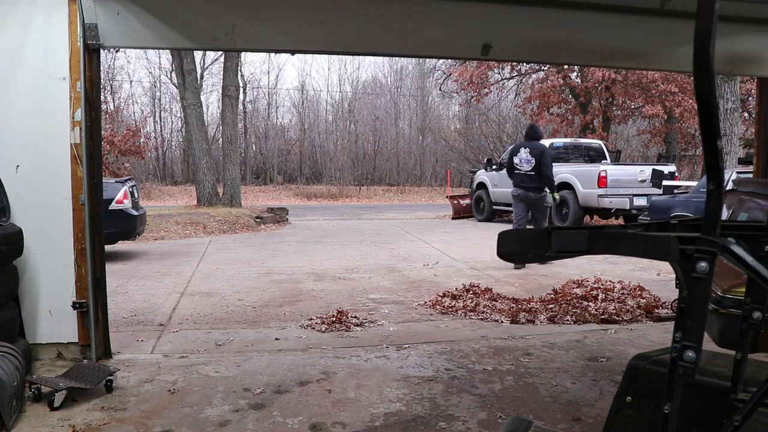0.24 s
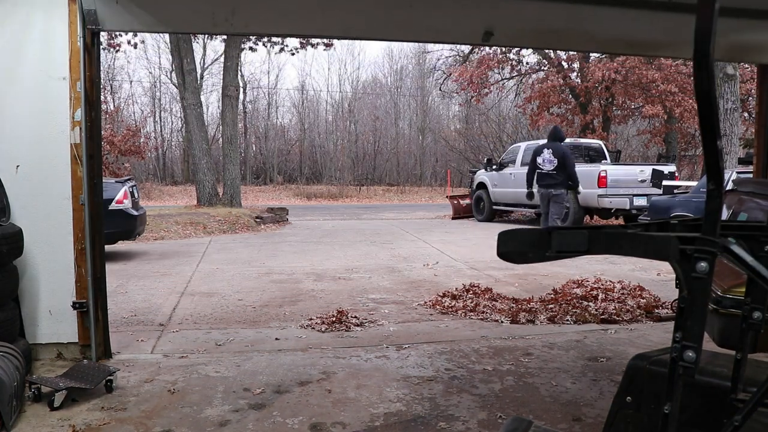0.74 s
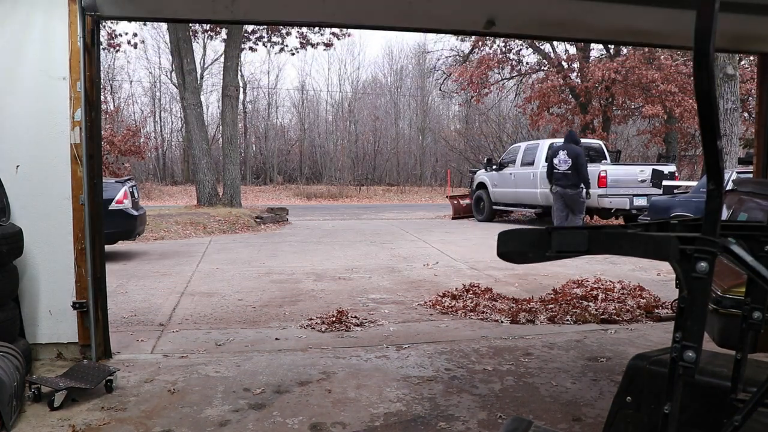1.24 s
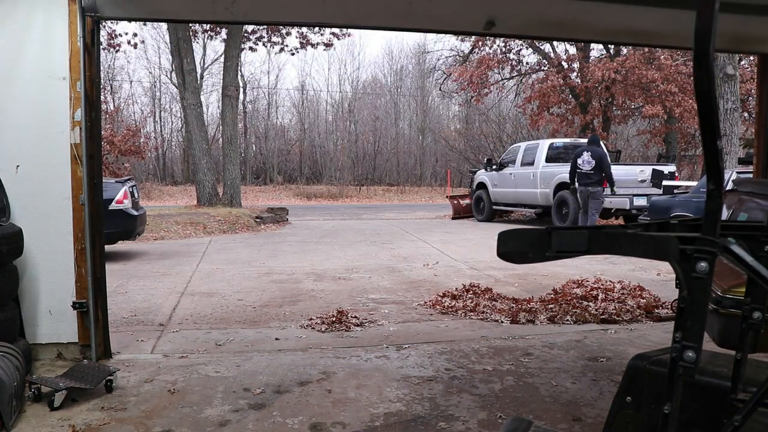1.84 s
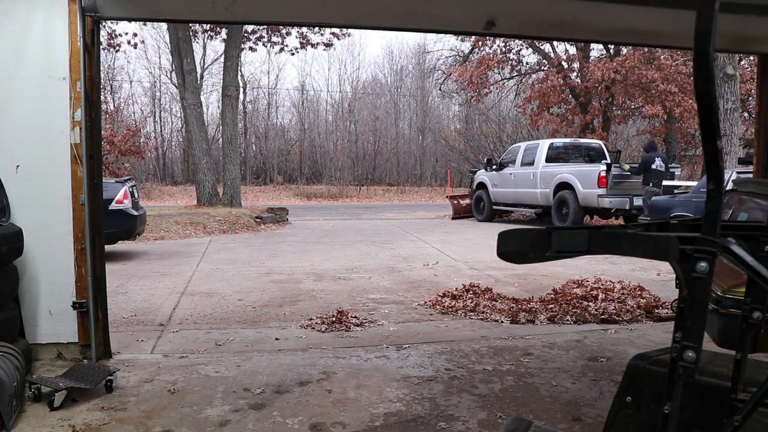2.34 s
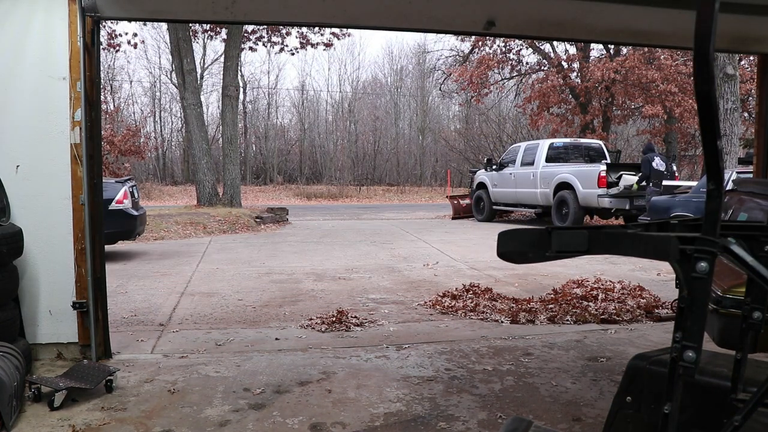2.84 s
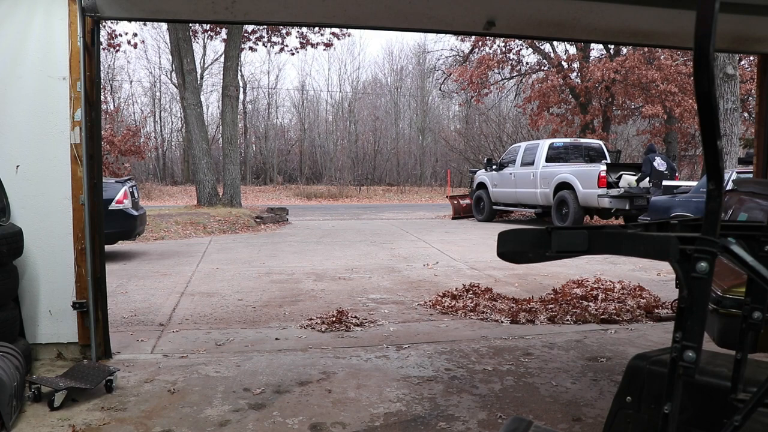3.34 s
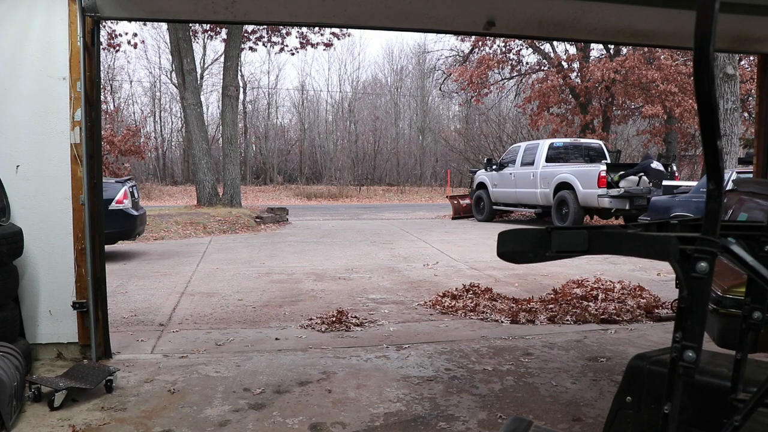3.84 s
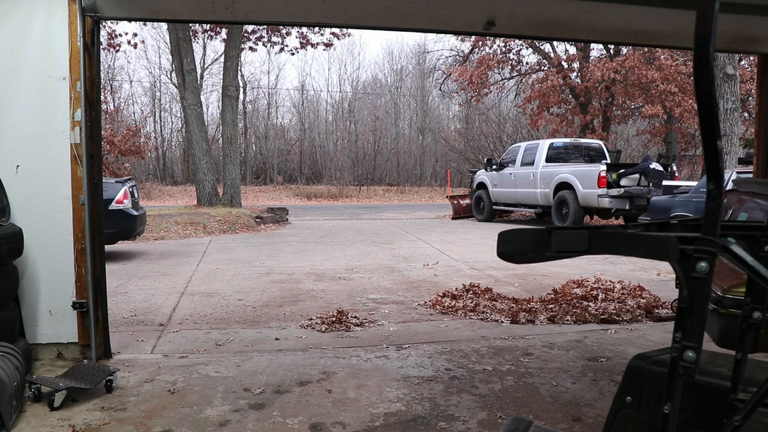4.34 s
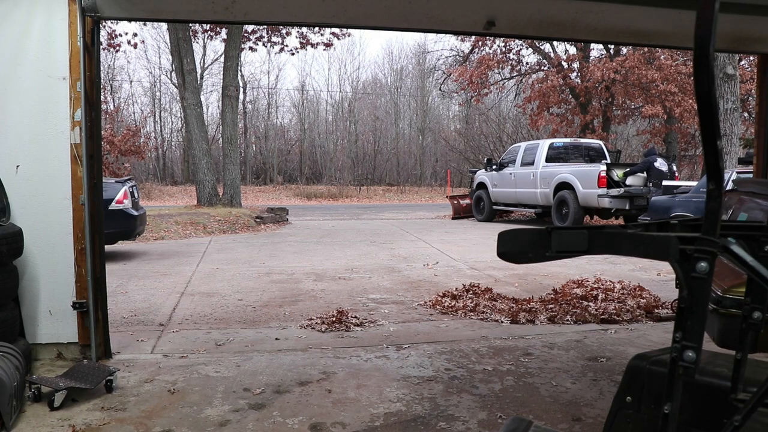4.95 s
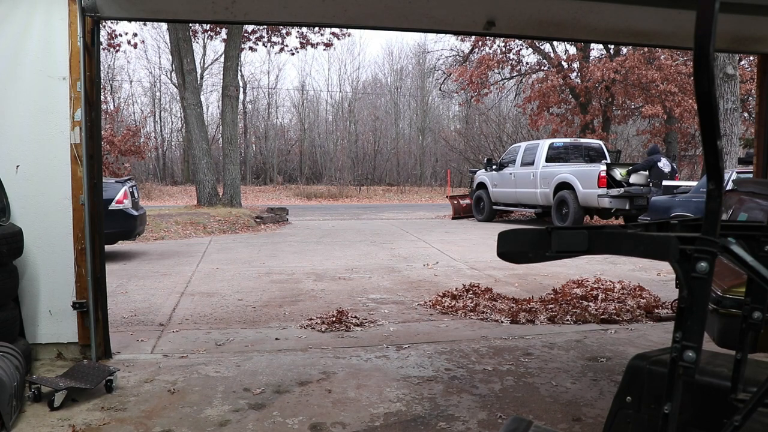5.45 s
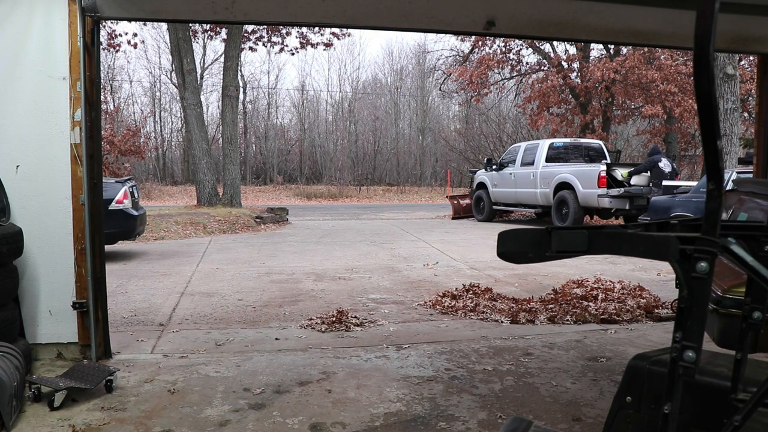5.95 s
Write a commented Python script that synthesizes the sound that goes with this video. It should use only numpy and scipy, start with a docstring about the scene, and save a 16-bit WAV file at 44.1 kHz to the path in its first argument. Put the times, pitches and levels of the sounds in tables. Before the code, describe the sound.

A motor buzz and gritty door rumble cut out after a second, followed by sharp snaps, metallic knocks, brief squeaks and light chain jingles.

```python
"""An electric opener hums and drags a sectional door up its tracks, then stops and the door settles.
The hum is a few unsteady sine waves; the door is gritty noise through resonances, with jolts on top.
Boards and tools knock, scrape and squeak on a truck bed: noise bursts that make sheet metal ring.
Sharp snaps sound close by and a small chain jingles as a group of high sine tones.
Knocks, scrapes, squeaks and snaps echo briefly in the open garage, over a faint bed of outdoor air."""
import sys
import numpy as np
from scipy import signal
from scipy.fft import rfft, irfft, next_fast_len
from scipy.io import wavfile
from scipy.ndimage import uniform_filter1d

SR = 44100
rng = np.random.default_rng(int(sys.argv[2]) if len(sys.argv) > 2 else 0)


def store_pcm(level_fs):
    """Save levels as 16-bit WAV."""
    pcm = np.round(np.clip(level_fs, -1, 1) * 32767).astype(np.int16)
    wavfile.write(sys.argv[1], SR, np.atleast_2d(pcm).T)


N = 273861  # length of the scene [samples]

# Motor hum: fundamental, second and third harmonic: (level [dB])
HUM_LEVELS = [-17.5, -24.5, -28]
# Low shudders of the drive as it runs down: (time [s], level [dB], pitch [Hz], length [s])
SHUDDERS = [(1.15, -18.5, 219, 0.046)]
# Tone colour of the rolling door: (frequency [Hz], relative level [dB per Hz])
RUMBLE_COLOUR = [(20, -34), (100, -15.5), (300, -2.5), (460, -10), (1250, -12.5), (1700, -17.5),
                 (3640, -18.5), (4500, -25), (8000, -44.5), (15800, -51)]
# Resonances of the door and tracks: (frequency [Hz], width [Hz], level [dB])
PANELS = [(692, 35, -4), (1160, 75, -8.5), (3750, 19, -10)]
# Jolts of hinges and rollers: (time [s], clank level [dB], treble tick level [dB])
JOLTS = [(.052, -37, -40), (.14, -24, -56), (.239, -25, -63), (0.311, -24.5, -41), (.409, -23.5, -66),
         (.47, -25, -41), (.715, -25, -38.5), (0.768, -22.5, -43), (.924, -22.5, -41), (1.007, -50, -35),
         (1.07, -25, -31.5), (1.173, -26, -52)]
# Tone colour of the outdoor air: (frequency [Hz], relative level [dB per Hz])
AIR_COLOUR = [(15, -48), (25, 0.5), (179, -7.5), (654, -11), (4210, -25.5), (15800, -25.5)]
# The stopped door settles: (time [s], level [dB], bass above it [dB], brightness [dB],
# ring pitch [Hz], ring above the level [dB], contact length [s])
SETTLING = [(1.199, -27, -8, -1, 690, 9, 0.012), (1.21, -27, -1, -15, 924, -1, 0.07),
            (1.384, -51.5, -14, 14.5, 470, 12, 0.048), (1.538, -50.5, 13, 7, 820, 2, 0.034),
            (1.592, -29, -6.5, -7, 1170, -18, 0.078), (1.647, -28.5, -2.5, 2, 2086, 4, 0.032),
            (1.947, -52, 11.5, 9, 487, -4, 0.012)]
# Knocks on the truck bed: (time [s], level [dB], bass above it [dB], brightness [dB],
# ring pitch [Hz], ring above the level [dB], contact length [s])
KNOCKS = [(2.009, -34, -1, -23, 702, -4, 0.14), (2.03, -25, -1, -5, 752, 12, 0.024),
          (2.157, -40.5, -21, 4, 810, 6, 0.012), (2.243, -40.5, 0, -5, 1000, -21, 0.032),
          (2.351, -17, -1, -4, 1037, 2, 0.016), (2.559, -36, -6, -7.5, 1170, -1, 0.034),
          (2.704, -38.5, -5.5, -3.5, 1350, -13, 0.031), (3.238, -45, 1.5, -2, 1200, -8, 0.024),
          (3.348, -44, 6.5, -11.5, 677, 2, 0.022), (3.9, -54, 6, -17, 290, -8, 0.17),
          (4.081, -33.5, -1.5, -17.5, 252, -6, 0.052), (4.462, -26, -1.5, -6.5, 135, 11, 0.036),
          (4.574, -18, -8.5, -8.5, 707, -9, 0.074), (4.708, -31, -7, 0.5, 997, 6, 0.057),
          (4.806, -41.5, -9, 4.5, 967, 14.5, 0.17), (4.876, -23.5, -7, -11.5, 125, -2, 0.065),
          (5.072, -14.5, -2.5, -9, 561, 3, 0.037), (5.124, -31.5, -22, -2, 581, 12, 0.053),
          (5.281, -27.5, 3.5, -2, 221, 4, 0.033), (5.52, -32, -27, -3, 1350, 18, 0.019),
          (5.539, -31, 6.5, 0, 164, -16, 0.039), (5.573, -27, -8, -1.5, 167, 12.5, 0.017),
          (5.594, -29.5, -10, -1, 162, 9, 0.025), (5.694, -48.5, -14, 17.5, 1320, -3, 0.038),
          (5.961, -29.5, -4, -6, 547, -8, 0.018), (6.172, -45, 5.5, -14, 450, -9, 0.019)]
# Scrapes and blows with their own onset: (time [s], level [dB], bass above it [dB], brightness [dB],
# ring pitch [Hz], ring above the level [dB], contact length [s], rise [s], top band against upper band [dB])
SCRAPES = [(2.34, -30.5, -36, 3, 944, -5, 0.028, 0.0066, -1.5),
           (2.912, -46, 0, -3, 1240, -15, 0.038, 0.0014, -42),
           (3.169, -34, 1, -6, 203.4, 9.5, 0.053, 0.011, -15),
           (3.463, -23.5, -27, -11.5, 1133, 1, .015, 0.001, -19),
           (3.693, -28.5, -13, 2.5, 1463, 18, 0.025, 0.02, -0.5),
           (5.205, -23, -4, -10, 1355, 3, 0.039, 0.0017, -3.5),
           (5.478, -30, -3.5, -11, 577.3, 2, 0.077, 0.0028, -42),
           (5.763, -24.5, -4, -12, 1357, -6, 0.028, 0.0055, -35),
           (5.884, -48, 3.5, 14, 1250, 9, 0.057, 0.003, -14.5),
           (6.007, -28.5, -29, -3, 1354, 21, 0.01, 0.0066, -22)]
# Tone colour of knocks and dragging: (frequency [Hz], relative level [dB per Hz])
KNOCK_COLOUR = [(50, -27), (95, -1.5), (400, -3.5), (1300, -3.5), (1750, -9.5), (3700, -15), (4500, -19),
                (5800, -21), (6800, -27.5), (15800, -45.5)]
# Middles of the bass, middle, upper and top band of a knock: (frequency [Hz])
KNOCK_BANDS = [200, 1050, 4000, 10500]
# Resonances of the struck sheet metal: (frequency [Hz], width [Hz], level [dB])
SHEET_METAL = [(146.6, 3.4, -28), (553, 6.1, 5.5), (1200, 49, -10), (2263, 48, -1.5), (2990, 51, -8.5),
               (3760, 280, -10), (5220, 270, 1)]
# Dragging between the knocks: (time [s], level [dB])
DRAG = [(4.2, -58), (4.42, -44.5), (4.65, -35.5), (5, -29), (5.47, -47), (5.9, -46), (6.02, -37)]
# Echoes in the garage: (frequency [Hz], time to fall by 60 dB [s])
ECHO_TIMES = [(100, 0.61), (700, 0.56), (4850, 0.46), (12000, 0.28)]
# Sharp snaps close by: (time [s], level [dB], pitch [Hz])
SNAPS = [(1.591, -9, 6200), (1.6318, -8, 2900), (1.641, -7, 3800), (1.649, -6, 3300), (6.02, -14, 3330),
         (6.045, -17, 3240), (6.0615, -5.5, 3060)]
# Links of the chain: (pitch [Hz], level [dB])
LINKS = [(12925, -2), (13975, -2.5), (14255, -21), (14556, -10.5), (14643, -15)]
# Shakes of the chain: (time [s], level [dB], pitch of the favoured link [Hz], level of the links' clash [dB])
JINGLES = [(4.61, -43, 13800, -58), (4.725, -29, 14540, -49), (4.835, -57, 14720, -40),
           (4.899, -36, 14300, -66), (4.958, -38, 14660, -49), (5.132, -32, 14500, -58),
           (5.284, -30, 14800, -43), (5.429, -41, 14500, -70), (5.58, -35, 14600, -58),
           (5.695, -38, 14660, -50), (5.884, -47, 12925, -56), (6.015, -51, 13975, -53),
           (6.04, -37, 14280, -54), (6.093, -50, 13975, -42)]
# Squeaks of something rubbing: (time [s], length [s], level [dB], first pitch [Hz], last pitch [Hz])
SQUEAKS = [(4.626, 0.021, -16.5, 1424, 1314), (5.478, 0.055, -23, 676, 518),
           (5.958, 0.055, -29.5, 373, 343), (5.963, 0.046, -25, 560, 551)]

HUM_HZ = 119.9  # twice the mains frequency
START_DIP_DB, START_S = -3, 0.11  # the hum starts lower and comes up
STRAIN_S, STRAIN_LENGTH_S, STRAIN_DB = 1, 0.026, 2  # the hum swells once near the top of the travel
STOP_S, CUT_S, CUT_DB, COAST_DB_PER_S = 1.093, 0.02, -7, -84  # power off: quick drop, then a run-down
ROLL_DB, ROLLERS_DB = -21, -36  # rumble of the door and treble of its rollers
ROLL_FADE_DB_PER_S, ROLLERS_FADE_DB_PER_S = -72, -40  # their fades after the stop
REST_DB, REST_FADE_DB_PER_S = -20, -8  # a weaker part of the rumble lingers: level below it, slow fade
AIR_DB = -52.5
SETTLE_RISE_S, KNOCK_RISE_S = 0.00099, 0.0018
SETTLE_TOP_DB, KNOCK_TOP_DB = -5, -14.5  # top band against the upper band, before the next adjustment
TOP_PER_DB, USUAL_DB = -0.06, -38  # contacts with more treble than usual get slightly less top band
CRACK, CRACK_S = 0.93, 0.00091  # the first touch is harder: extra height and its decay time
RATTLE_DB, RATTLE_S = -21, 0.099  # loose parts rattle on: level below the contact, time to fall to 1/e
SPOT_DB, SPOT_DETUNE = 2.5, 0.03  # each blow lands elsewhere: spread of resonance level and relative pitch
# the sound of the clatter is cut off abruptly, even in mid-ring, and its echoes are turned down at once;
# its direct sound is switched on again shortly after
CUT_OFF_S, MUTED_S = 6.017, 0.05
TOP_EDGE_HZ = 15850  # nearly nothing is left above this


def gain_of(db):
    """Turns decibels into a multiplier."""
    return 10 ** (np.asarray(db) / 20)


def evened(x):
    """Scales a sound to an average (rms) level of 1."""
    return x / np.sqrt(np.mean(x ** 2) + 1e-20)


def read(points, hz):
    """Reads a table between its points at the frequencies hz."""
    f, value = np.transpose(points)
    return np.interp(np.log(hz + 1), np.log(f + 1), value)


def add(mix, s, sound):
    """Adds a sound to the mix at s seconds, cut off at the end."""
    part = mix[round(s * SR):][:len(sound)]
    part += sound[:len(part)]


def shaped(x, gain):
    """Filters x by gain(hz), then evens its level."""
    n = next_fast_len(len(x))
    spectrum = rfft(x, n) * gain(np.fft.rfftfreq(n, 1 / SR))
    return evened(irfft(spectrum, n)[:len(x)])


def resonate(x, hz, width_hz):
    """One resonance of gain 1: shift its pitch to zero, smooth, shift back."""
    turn = np.exp(2j * np.pi * hz * np.arange(len(x)) / SR)
    r = np.exp(-np.pi * width_hz / SR)
    return 2 * (turn * signal.lfilter([1 - r], [1, -r], x / turn)).real


def slow_noise(n, width):
    """Wandering curve: noise averaged over width samples, rms 1."""
    return evened(uniform_filter1d(rng.standard_normal(n), width))


def grit(n, spread_db, grain_s, taps_per_s=0, taps=0):
    """Noise of many small contacts: its level wanders grain by grain; loose parts add separate taps."""
    lumps = slow_noise(n, max(round(grain_s * SR), 1))
    loose = rng.laplace(0, 1, n) * (rng.random(n) < taps_per_s / SR)
    rub = evened(rng.standard_normal(n) * gain_of(spread_db * lumps))
    return evened(rub + taps * evened(loose))


def blow(contact_s, rise_s, squareness=2.0):
    """Envelope of a contact: it builds up, then fades; higher squareness holds longer and ends faster."""
    t = np.arange(SR // 4) / SR
    rise = np.minimum(t / max(rise_s, .0005), 1) ** 2
    return rise * np.exp(-(t / np.clip(contact_s, .002, .15)) ** squareness)


def after_stop(db_per_s):
    """Level change in dB: none until the motor stops, then a steady fall."""
    return db_per_s * np.maximum(np.arange(N) / SR - STOP_S, 0)


def motor():
    """The windings buzz at twice the mains frequency; the load shakes the upper harmonics more."""
    t = np.arange(N) / SR
    power_db = START_DIP_DB * np.maximum(1 - t / START_S, 0)
    power_db += CUT_DB * np.clip((t - STOP_S) / CUT_S, 0, 1)
    power_db += STRAIN_DB * np.exp(-((t - STRAIN_S) / STRAIN_LENGTH_S) ** 2)
    out = np.zeros(N)
    for k, db in enumerate(HUM_LEVELS, 1):
        waver = 0.14 * slow_noise(N, 900)  # phase [radians]
        shake_db = 0.79 * k * slow_noise(N, 2500)
        level = gain_of(db + power_db + shake_db + after_stop(COAST_DB_PER_S))
        phase = k * (2 * np.pi * HUM_HZ * t + waver) + np.pi * (k - 1)
        out += np.sqrt(2) * level * np.cos(phase)
    for s, db, hz, length_s in SHUDDERS:
        tone = np.sin(2 * np.pi * hz * t[:SR // 4])
        add(out, s, gain_of(db) * tone * blow(length_s, 0.0085))
    return out


def jolt(db, tick_db):
    """Hinges and rollers strike: a low clank with two rings, and a treble tick."""
    x = grit(SR // 4, 2.9, 0.0068, 600, 0.24)
    clank = shaped(x, lambda hz: 1 / (1 + (600 / (hz + 1)) ** 4) / (1 + (hz / 1600) ** 2))
    clank = clank + 2.8 * sum(resonate(clank, hz * rng.uniform(0.89, 1.04), 120) for hz in (3750, 4950))
    tick = shaped(x, lambda hz: 1 / (1 + (5200 / (hz + 1)) ** 6) / (1 + (hz / 11000) ** 2))
    # small brackets ping
    tick = tick + sum(4.5 * rng.random() * resonate(tick, hz, 48) for hz in (8950, 10440))
    return gain_of(db) * clank * blow(0.044, 0.00082) + gain_of(tick_db) * tick * blow(0.072, 0.0014, 0.8)


def door():
    """Rollers grind in the tracks and shake the panels; jolts ride on top."""
    rumble = gain_of(ROLL_DB + after_stop(ROLL_FADE_DB_PER_S))
    rumble = rumble + gain_of(ROLL_DB + REST_DB + after_stop(REST_FADE_DB_PER_S))
    treble = gain_of(ROLLERS_DB + after_stop(ROLLERS_FADE_DB_PER_S))
    grind = grit(N, 1.2, 0.014, 700, 0.24)
    # the rumble and the treble share one tone colour, split near 5500 Hz
    body = shaped(grind, lambda hz: gain_of(read(RUMBLE_COLOUR, hz)) / (1 + (hz / 5500) ** 8))
    panels = sum(gain_of(db) * resonate(grind, hz, width_hz) for hz, width_hz, db in PANELS)
    body = evened(body + 5.1 * panels)
    fizz = shaped(grit(N, 2.1, 0.015),
                  lambda hz: gain_of(read(RUMBLE_COLOUR, hz)) / (1 + (5500 / (hz + 1)) ** 8))
    out = rumble * body + treble * fizz
    for s, db, tick_db in JOLTS:
        add(out, s, jolt(db, tick_db))
    return out


def yard_air():
    """Faint outdoor air: coloured noise whose level wanders slowly."""
    return gain_of(AIR_DB) * shaped(grit(N, 0.78, 0.21), lambda hz: gain_of(read(AIR_COLOUR, hz)))


def knock_band(x, k):
    """Band k of a knock, cross-faded with its neighbours."""
    share = list(zip(KNOCK_BANDS, np.eye(4)[k]))
    return shaped(x, lambda hz: gain_of(read(KNOCK_COLOUR, hz)) * read(share, hz) ** 1.35)


def sheet_metal(x, heavy):
    """Sheet metal rings along with a contact x; only its heavy part moves the resonances below 600 Hz."""
    out = x.copy()
    for hz, width_hz, db in SHEET_METAL:
        louder, higher = rng.standard_normal(2)
        peak = signal.iirpeak(hz * (1 + SPOT_DETUNE * higher), hz / width_hz, SR)
        push = heavy if hz < 600 else x
        out += gain_of(db + SPOT_DB * louder) * signal.lfilter(*peak, push)
    return out


def knocks():
    """Each contact is a gritty burst that sounds the sheet metal, plus the short ring of what struck it."""
    out, rings = np.zeros(N), np.zeros(N)
    contacts = [(*row, SETTLE_RISE_S, SETTLE_TOP_DB) for row in SETTLING]
    contacts += [(*row, KNOCK_RISE_S, KNOCK_TOP_DB) for row in KNOCKS]
    contacts += [tuple(row) for row in SCRAPES]
    t = np.arange(SR // 4) / SR
    crack = 1 + CRACK * np.exp(-t / CRACK_S)
    rattle = gain_of(RATTLE_DB) * blow(RATTLE_S, KNOCK_RISE_S, 1.0)
    for s, db, bass_db, bright_db, hz, ring_db, contact_s, rise_s, top_db in contacts:
        x = grit(len(t), 2.0, .004, 350, 0.35)
        top_db += TOP_PER_DB * (db + bright_db - USUAL_DB)
        top = gain_of(top_db) * knock_band(x, 3) * blow(1.14 * contact_s, 0)  # the top band dies first
        burst = knock_band(x, 1) + gain_of(bright_db) * (knock_band(x, 2) + top)
        burst = burst * (crack * blow(contact_s, rise_s) + rattle)
        # bass builds up more slowly
        thump = gain_of(bass_db) * knock_band(x, 0) * blow(1.57 * contact_s, rise_s + 0.0093)
        add(out, s, gain_of(db) * sheet_metal(burst + thump, thump))
        waver = np.cumsum(uniform_filter1d(rng.standard_normal(len(t)), 60)) * 0.07  # the pitch is loose
        ring = np.sin(2 * np.pi * hz * t + waver)
        add(rings, s, gain_of(db + ring_db) * ring * blow(contact_s, 2 * rise_s))
    return out, rings


def garage(x):
    """Sparse echoes of random sign, each band dying at its own speed; three echo patterns take turns."""
    out, at = np.zeros(N), np.arange(300, SR - 20, 20)
    for k in range(3):
        taps = np.zeros(SR)
        taps[at + rng.integers(0, 20, len(at))] = rng.choice([-1., 1.], len(at))
        hz, t, z = signal.stft(taps, SR, nperseg=256)
        fade = gain_of(-60 * t / read(ECHO_TIMES, hz)[:, None])
        tail = signal.istft(z * fade, SR, nperseg=256)[1]
        share = np.sqrt(2 / 3) * np.cos(np.pi * (np.arange(N) / SR * 70 + k / 3))
        out += signal.fftconvolve(x * share, tail / np.linalg.norm(tail))[:N]
    return out


def snaps():
    """Single sharp cracks: a very short ring, a click and a brief rattle after it."""
    out, t = np.zeros(N), np.arange(1200) / SR
    for s, db, hz in SNAPS:
        click = shaped(rng.standard_normal(len(t)), lambda f: (f > 1500) / (1 + (f / 12000) ** 4))
        crack = np.sin(2 * np.pi * hz * t) + 0.11 * click
        crack = crack * np.exp(-t / 0.00045) * (1 - np.exp(-t * SR / 4))
        rattle = 0.11 * evened(resonate(click, hz, 1100)) * np.exp(-t / 0.0091)
        add(out, s, gain_of(db) * (crack + rattle))
    return out


def dragging():
    """Things slide over the sheet metal: gritty noise that follows a level curve and makes it ring."""
    s, db = np.transpose(DRAG)
    level = gain_of(np.interp(np.arange(N) / SR, s, db, -120, -120))  # practically silent outside the table
    drag = level * shaped(grit(N, 1.5, 0.016), lambda hz: gain_of(read(KNOCK_COLOUR, hz)))
    return sheet_metal(drag, drag)


def chain():
    """Small links ring long and high, flickering as they touch; each shake favours some of them."""
    out, t = np.zeros(N), np.arange(SR // 2) / SR
    for s, db, favoured_hz, clash_db in JINGLES:
        clash = shaped(grit(SR // 4, 3, .003), lambda f: 1 / (1 + (6000 / (f + 1)) ** 4))
        add(out, s, gain_of(clash_db) * clash * blow(0.029, 0.0028))
        for hz, link_db in LINKS:
            off_db = -min(abs(hz - favoured_hz) / 30, 22)  # links away from the favoured pitch are weaker
            flicker_db = 5.8 * slow_noise(len(t), 400)
            fade_db = -60 * t / 0.39
            ring = np.sin(2 * np.pi * (hz * rng.normal(1, 0.00183) * t + rng.random()))
            ring = ring * (1 - np.exp(-t / 0.0028))
            add(out, s, gain_of(db + link_db + off_db + flicker_db + fade_db) * ring)
    return out


def squeaks():
    """Rubbing gives a slightly unsteady tone that slides down, with a weak second harmonic."""
    out = np.zeros(N)
    for s, length_s, db, first_hz, last_hz in SQUEAKS:
        u = np.linspace(0, 1, round(length_s * SR))
        unsteady = 0.026 * slow_noise(SR // 8, 150)[:len(u)]
        pitch_hz = (last_hz + (first_hz - last_hz) * (1 - u) ** 2) * (1 + unsteady)
        phase = 2 * np.pi * np.cumsum(pitch_hz) / SR
        tone = np.sin(phase) + 0.11 * np.sin(2 * phase)
        add(out, s, gain_of(db) * np.sin(np.pi * u) ** 0.71 * tone)
    return out


def scene():
    """Mixes the opener, door, clatter, snaps, chain and air, with echoes of the clatter and snaps."""
    contacts, rings = knocks()
    contacts = contacts + dragging()
    rings = rings + squeaks()
    near = snaps()
    t = np.arange(N) / SR
    until_cut = np.clip((CUT_OFF_S - t) / 0.0037, 0, 1)
    on_again = t > CUT_OFF_S + MUTED_S
    # only clatter from before the cut feeds the echoes, which are held at 0.3 of their level from then on
    echoes = gain_of(-5.5) * garage((contacts + 0.52 * rings) * until_cut) * np.maximum(until_cut, .3)
    clatter = (contacts + rings) * (until_cut + on_again) + echoes
    # deep bass does not carry across the yard
    clatter = signal.lfilter(*signal.butter(3, 105, "high", fs=SR), clatter)
    near = near + gain_of(-6.5) * garage(near)
    return (motor() + door() + yard_air() + clatter + near + chain())[None]


def record(dry):
    """Rounds the loudest peaks softly, then cuts the highest treble."""
    rounded = 1.255 * np.tanh(dry / 1.451)
    low_pass = signal.firwin(511, TOP_EDGE_HZ, window=("kaiser", 9), fs=SR)
    return signal.oaconvolve(rounded, low_pass[None], "same")


dry = scene()
out = record(dry)
store_pcm(out)
```